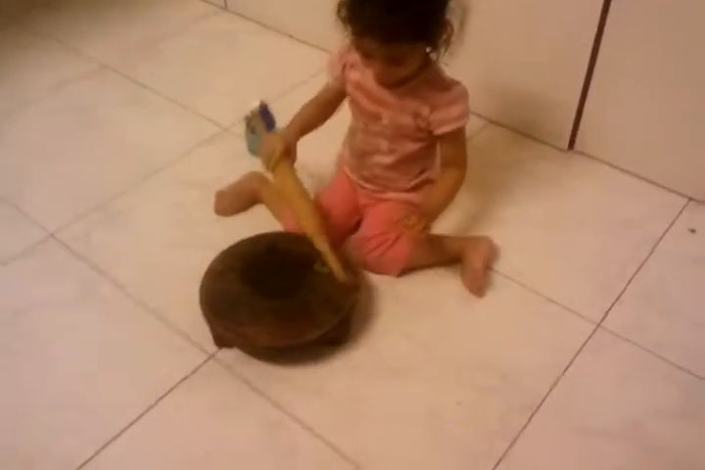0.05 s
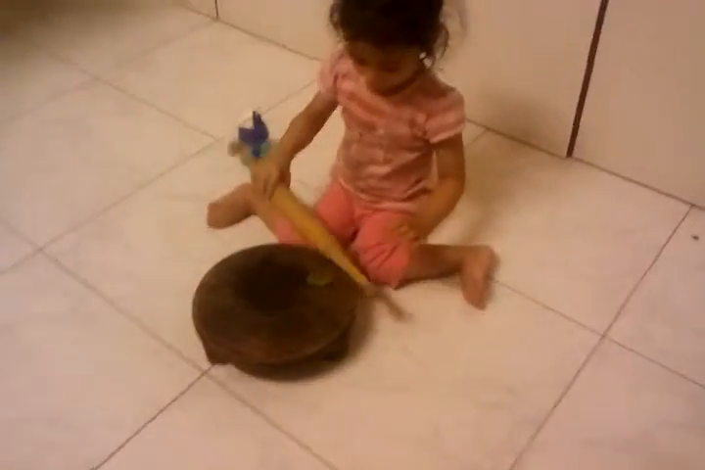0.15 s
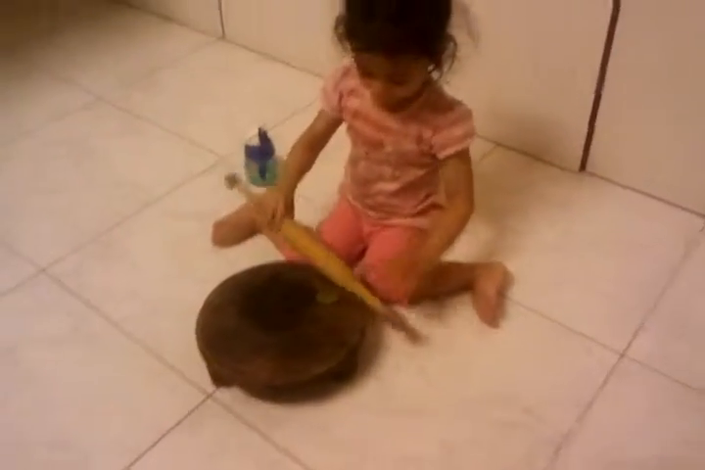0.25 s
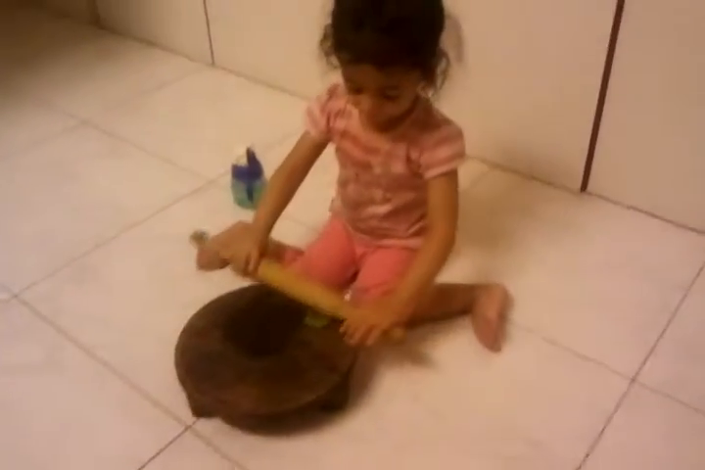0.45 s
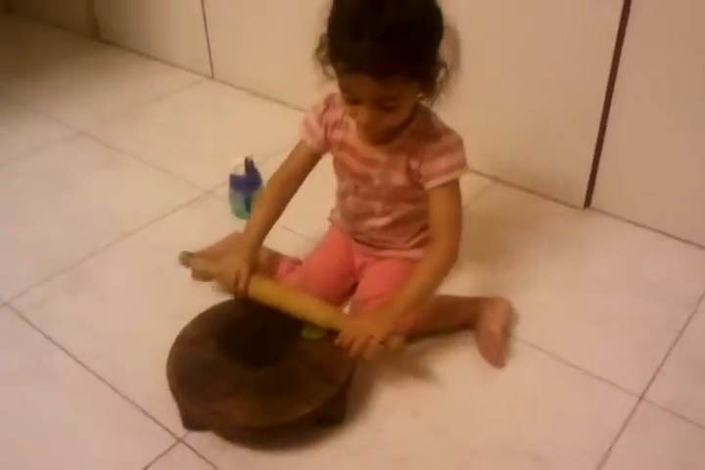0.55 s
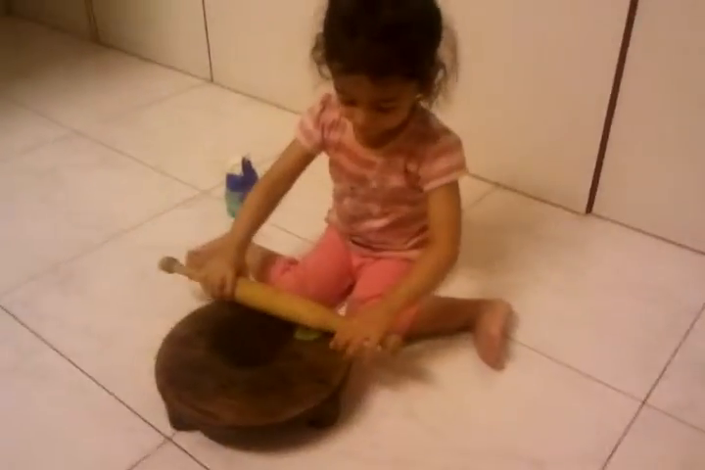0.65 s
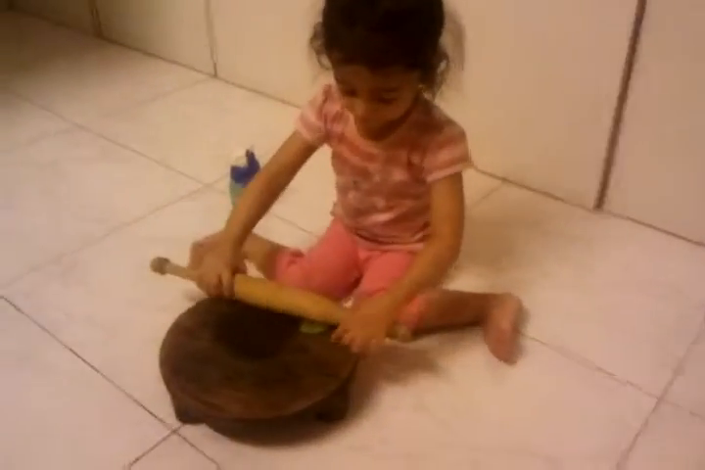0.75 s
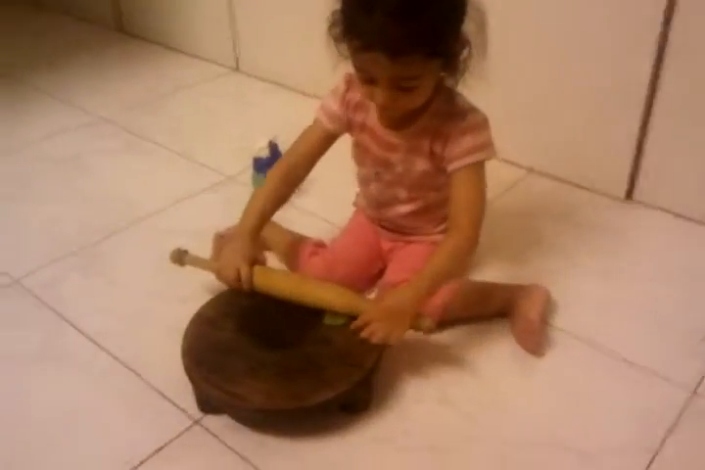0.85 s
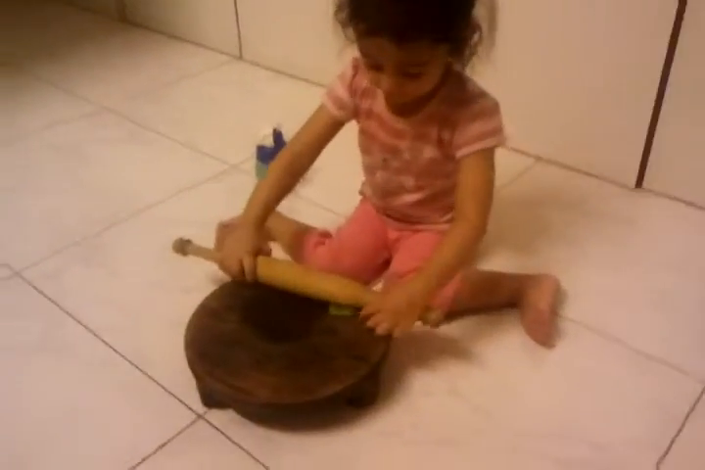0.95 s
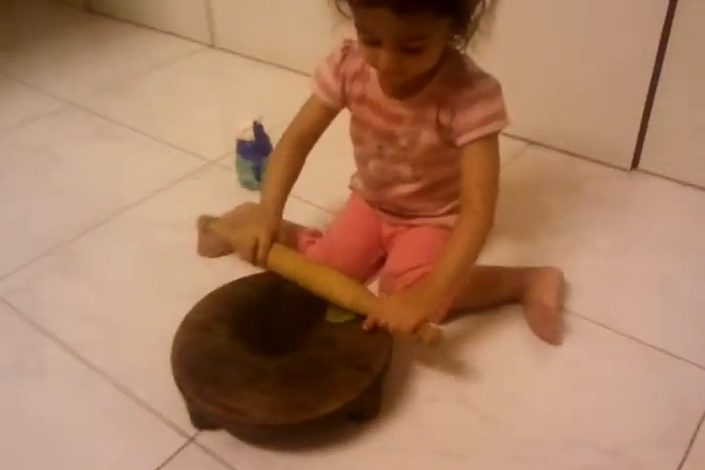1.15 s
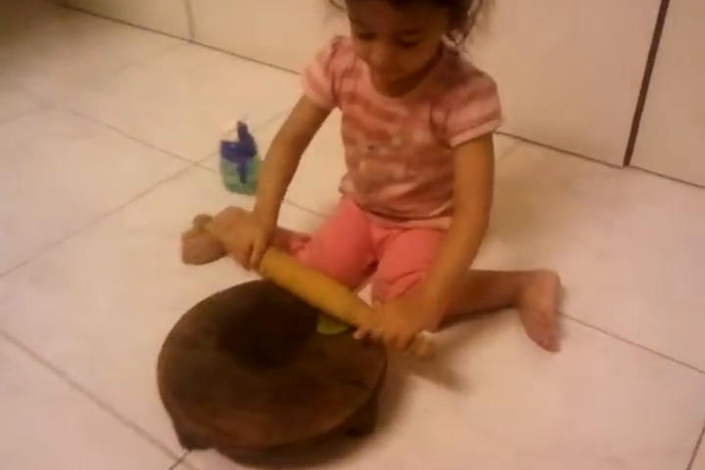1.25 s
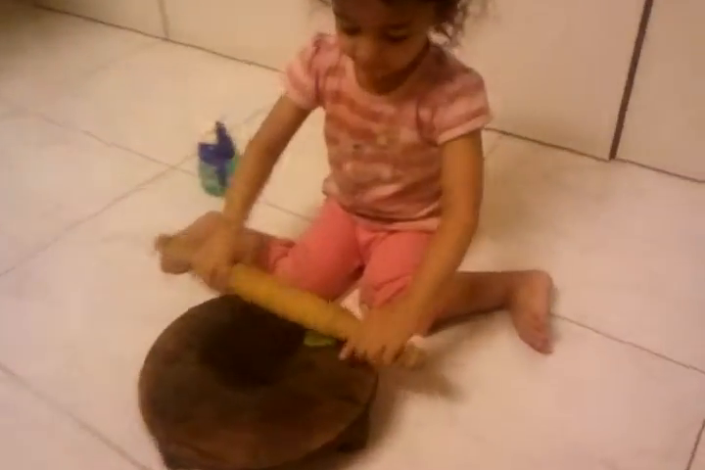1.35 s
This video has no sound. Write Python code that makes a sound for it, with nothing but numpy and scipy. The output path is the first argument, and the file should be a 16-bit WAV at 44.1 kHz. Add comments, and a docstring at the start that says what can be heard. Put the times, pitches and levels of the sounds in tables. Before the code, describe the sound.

A wooden rolling pin knocks brightly on a tiled floor, then lands with a hollow bounce on a wooden board. It rolls with a soft rumble and small ticks in a hard, echoing room with steady background noise.

```python
"""In a small hard room, a wooden rolling pin knocks on the tiled floor, then bounces on a round board.
The tile makes the pin ring brightly; the wooden board answers with a lower, hollow knock.
The pin then rolls over the board: many tiny contacts make a low rumble, with sharp ticks and soft bumps.
Steady room noise lies underneath, and the two loud knocks overload the microphone."""
import sys
import numpy as np
from scipy import signal
from scipy.fft import rfft, irfft
from scipy.io import wavfile
from scipy.ndimage import uniform_filter1d

SR = 44100
rng = np.random.default_rng(int(sys.argv[2]) if len(sys.argv) > 2 else 0)


def wrap_up_sound(samples):
    """Save the sound to the file named by the first command line argument, as 16-bit audio."""
    columns = np.atleast_2d(samples).T
    # keep every value between -1 and 1, then stretch to whole-number steps
    tamed = np.clip(columns, -1, 1)
    steps = np.round(tamed * 32767).astype(np.int16)
    wavfile.write(sys.argv[1], SR, steps)


N = 61739

# The tone of the room noise. Each row: frequency in Hz, relative level in dB.
NOISE_SPECTRUM = [(15, -59.5), (25, -24.5), (100, -19), (160, -6.5), (194, -8.5), (236, -1), (384, -3),
                  (444, -9.5), (540, -5), (818, -6), (924, -7.5), (3450, -24), (4400, -25.5), (6820, -33.5),
                  (8500, -51), (11000, -101), (18700, -120)]
# How the hiss in that noise swells and sinks. Each row: time in seconds, boost in dB.
HISS_BOOST = [(0, -0.5), (0.07, 2.5), (0.21, 1.5), (0.27, 5), (0.38, 2), (0.5, 11.5), (0.68, 4),
              (0.88, 5.5), (1.0, 2.5), (1.13, 2), (1.19, 4), (1.4, 2.5)]
# The pin's tip hits the floor. Each row: start in seconds, level in dB.
FLOOR_HITS = [(0.2303, 0.5)]
# The tones the pin rings with. Each row: pitch in Hz, level in dB, seconds to fade by 60 dB.
PIN_TONES = [(525, -18.5, 0.05), (821, -25, 0.14), (1130, -28.5, 0.027), (1509, -8, 0.033),
             (1570, -41, 0.0081), (1815, -33.5, 0.044), (2126, -19.5, 0.062), (2275, -11, 0.047),
             (2442, -16, 0.056), (2682, -11, 0.029), (3450, -28, 0.09), (4036, -18, 0.027),
             (4500, -17, 0.01)]
# The pin lands on the board, bounces, and later bumps as it rolls.
# Each row: start in seconds, level in dB, treble limit in Hz.
BOARD_HITS = [(0.3964, 3, 3600), (0.3994, -3.5, 4500), (0.4094, 5, 907), (0.4145, 0, 2600),
              (0.4497, -3, 1800), (0.464, -7, 1665), (1.2585, -10.5, 525), (1.3540, -11, 170)]
# The tones of the board with the pin on it. Each row: pitch in Hz, level in dB, seconds to fade by 60 dB.
BOARD_TONES = [(370, -22, 0.028), (509, -25, 0.076), (575.4, -16.5, 0.18), (659.7, -23.5, 0.15),
               (683, -19, 0.18), (812, -24.5, 0.1), (1027, -22, 0.12), (1093.7, -9.5, 0.091),
               (1322, -23, 0.12), (1421, -12.5, 0.056), (1491.6, -19, 0.097), (1925, -12, 0.033),
               (2096, -26, 0.06), (2490, -20, 0.059), (2978, -20.5, 0.031), (3220, -13.5, 0.019),
               (3660, -8, 0.0034)]
# How loud the rolling is. Each row: time in seconds, level in dB.
ROLL_LEVELS = [(0.5, -85.5), (0.8, -38.5), (0.95, -66), (1.06, -37), (1.13, -52.5), (1.22, -47),
               (1.29, -41), (1.4, -40)]
# Small snaps under the rolling pin. Each row: start in seconds, level in dB, treble limit in Hz.
TICK_HITS = [(0.5917, -11, 8000), (0.7225, -7, 5000), (0.801, -13.5, 5000), (0.8254, -4.5, 4970),
             (0.8322, 0.5, 4900), (1.1740, -17, 5000)]
# The tones of one tick. Each row: pitch in Hz, level in dB, seconds to fade by 60 dB.
TICK_TONES = [(2940, -17.5, 0.0099), (3850, -17.5, 0.0012), (4210, -10.5, 0.0028), (6300, -35, .003)]
# How long the room echoes. Each row: frequency in Hz, seconds to fade by 60 dB.
ROOM_FADE = [(200, 0.4), (700, 0.44), (1500, 0.45), (2500, 0.58), (4200, 0.37), (7000, 0.38)]

# The brief crack that starts a hit. Each one: lowest Hz, highest Hz, gain in dB.
PIN_CRACK, BOARD_CRACK, TICK_CRACK = (1100, 2630, 22.3), (555, 1680, 27.2), (3190, 5000, 2.9)
FLOOR_REVERB_DB, BOARD_REVERB_DB, TICK_REVERB_DB = 2.5, -1.5, -8


def from_db(db):
    """Turn decibels into a number to multiply by."""
    return 10 ** (np.asarray(db) / 20)


def in_time(rows):
    """Join (seconds, value) points with straight lines, giving one value per sample."""
    return np.interp(np.arange(N) / SR, *np.transpose(rows))


def at_hz(rows, hz):
    """Read between (Hz, value) points, with every octave equally wide."""
    row_hz, value = np.transpose(rows)
    return np.interp(np.log(np.maximum(hz, 1)), np.log(row_hz), value)


def filtered(x, hz, kind, order=2):
    """Keep the "low", "high" or "band" part of a sound; a higher order cuts more steeply."""
    sections = signal.butter(order, hz, kind, fs=SR, output="sos")
    return signal.sosfilt(sections, x + 1e-18)


def click(start_s, db):
    """A push that lasts just one sample."""
    push = np.zeros(N)
    push[int(start_s * SR)] = from_db(db)
    return push


def smeared(force, centre_hz=2000, width_hz=1700):
    """Wood carries different pitches at different speeds, so a blow spreads over about a millisecond."""
    decay = np.exp(-np.pi * width_hz / SR)
    feedback = [1, -2 * decay * np.cos(2 * np.pi * centre_hz / SR), decay ** 2]
    for _ in range(2):  # each pass delays the band without changing its level
        force = signal.lfilter(feedback[::-1], feedback, force + 1e-18)
    return force


def struck(force, tones, crack):
    """A struck object gives a brief crack, then rings with its own fading tones."""
    low_hz, high_hz, crack_db = crack
    sound = from_db(crack_db) * filtered(force, [low_hz, high_hz], "band")
    for k, (hz, db, fade_s) in enumerate(tones):
        decay = np.exp(-np.log(1000) / (fade_s * SR))
        angle = 2 * np.pi * hz / SR
        ring = signal.lfilter([0, np.sin(angle)], [1, -2 * decay * np.cos(angle), decay ** 2], force + 1e-18)
        sound += (-1) ** k * from_db(db) * ring  # every second tone is flipped
    return sound


def in_room(sound, reverb_db, gap_s=0.0054, build_s=0.0042, even_width_hz=45):
    """Hard walls add reverb: a wash of echoes that builds up quickly and fades at a rate set by pitch."""
    t, hz = np.arange(N) / SR, np.arange(N // 2 + 1) * SR / N
    white = rfft(rng.standard_normal(N))
    edges_hz = np.r_[0, np.geomspace(250, 8000, 8), SR / 2]
    tail = np.zeros(N)
    for low, high in zip(edges_hz, edges_hz[1:]):
        band = irfft(white * (hz >= low) * (hz < high), N)
        tail += band * np.exp(-np.log(1000) * t / at_hz(ROOM_FADE, (low + high) / 2))
    onset = np.clip((t - gap_s) / build_s, 0, 1)
    spectrum = rfft(tail * onset)
    nearby_power = uniform_filter1d(np.abs(spectrum) ** 2, int(even_width_hz * N / SR))
    even_tail = irfft(spectrum / np.sqrt(nearby_power), N) * onset  # no pitch stands out
    return sound + from_db(reverb_db) * signal.fftconvolve(sound, even_tail[:N // 2])[:N]


def room_noise(base_db=-34.5, hiss_from_hz=1140):
    """A steady rush whose treble swells and sinks."""
    hz = np.arange(N // 2 + 1) * SR / N
    spectrum = rfft(rng.standard_normal(N)) * from_db(at_hz(NOISE_SPECTRUM, hz))
    rush = irfft(spectrum, N)
    hiss = irfft(spectrum * hz ** 4 / (hz ** 4 + hiss_from_hz ** 4), N)
    extra_hiss = hiss * (from_db(in_time(HISS_BOOST)) - 1)
    return from_db(base_db) * (rush + extra_hiss) / rush.std()


def pin_on_floor(top_hz=4670):
    """Hard tile sets the pin's own bright tones ringing."""
    blows = sum(click(start_s, db) for start_s, db in FLOOR_HITS)
    force = smeared(filtered(blows, top_hz, "low", order=10))
    force = filtered(force, hz=250, kind="high")
    return in_room(struck(force, PIN_TONES, PIN_CRACK), FLOOR_REVERB_DB)


def pin_on_board(top_hz=5200):
    """The board rings with a lower, hollow knock; softer contacts sound duller."""
    blows = sum(filtered(click(start_s, db), hz, "low") for start_s, db, hz in BOARD_HITS)
    force = smeared(filtered(blows, top_hz, "low", order=4))
    force = filtered(force, hz=200, kind="high")
    return in_room(struck(force, BOARD_TONES, BOARD_CRACK), BOARD_REVERB_DB)


def rolling(contacts_per_s=820, top_hz=704):
    """Many small, soft contacts at random moments shake the board into a rumble."""
    contacts = (rng.random(N) < contacts_per_s / SR) * rng.standard_normal(N)
    force = filtered(contacts, top_hz, "low")
    force = filtered(force, hz=180, kind="high")
    rumble = in_room(struck(force, BOARD_TONES, BOARD_CRACK), BOARD_REVERB_DB)
    return rumble / rumble.std() * from_db(in_time(ROLL_LEVELS))


def ticks(echo_s=0.0047, echo_db=-14.5):
    """Tiny snaps as the pin is pressed along, each with a quick echo off the tiles."""
    force = np.zeros(N)
    for start_s, db, top_hz in TICK_HITS:
        snap_and_echo = click(start_s, db) + click(start_s + echo_s, db + echo_db)
        force += filtered(snap_and_echo, top_hz, "low", order=6)
    force = filtered(force, hz=2500, kind="high", order=4)
    return in_room(struck(force, TICK_TONES, TICK_CRACK), TICK_REVERB_DB)


def thud(middle_s=0.805, width_s=0.028, pitch_hz=62, db=-41):
    """A faint, deep shudder as weight comes onto the board."""
    t = np.arange(N) / SR - middle_s
    swell = np.exp(-(t / width_s) ** 2)
    return from_db(db) * swell * np.sin(2 * np.pi * pitch_hz * t)


def scene():
    """Add up all the sounds at one microphone."""
    pin_sounds = pin_on_floor() + pin_on_board() + rolling() + ticks() + thud()
    return (pin_sounds + room_noise())[None]


def record(dry):
    """The overloaded microphone flattens the loudest peaks; deep bass and high treble are cut."""
    ceiling, hardness, bottom_hz, top_hz = 0.69, 6, 70, 8900
    flattened = dry / (1.5 + np.abs(dry / ceiling) ** hardness) ** (1 / hardness)
    treble_cut = signal.cheby2(14, 60, top_hz, fs=SR, output="sos")
    return signal.sosfilt(treble_cut, filtered(flattened, bottom_hz, "high"))


dry = scene()
out = record(dry)
wrap_up_sound(out)
```